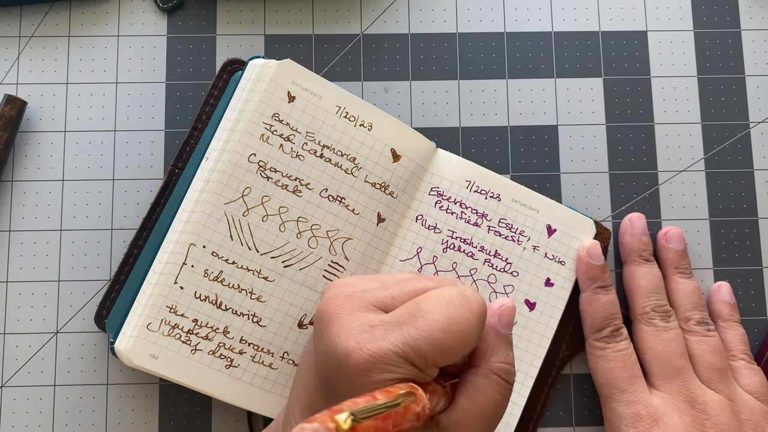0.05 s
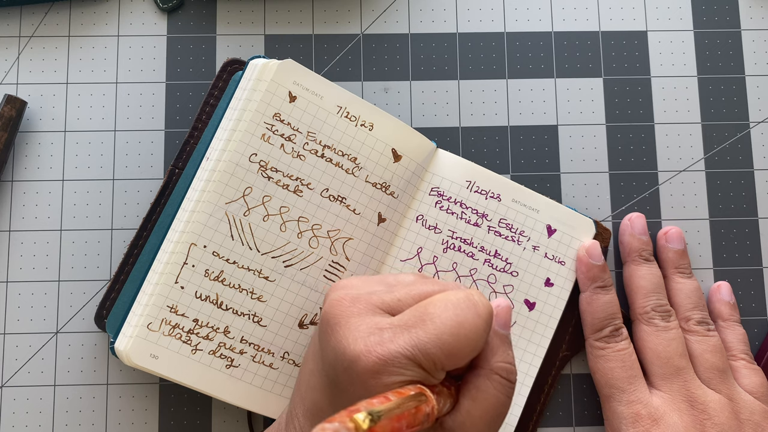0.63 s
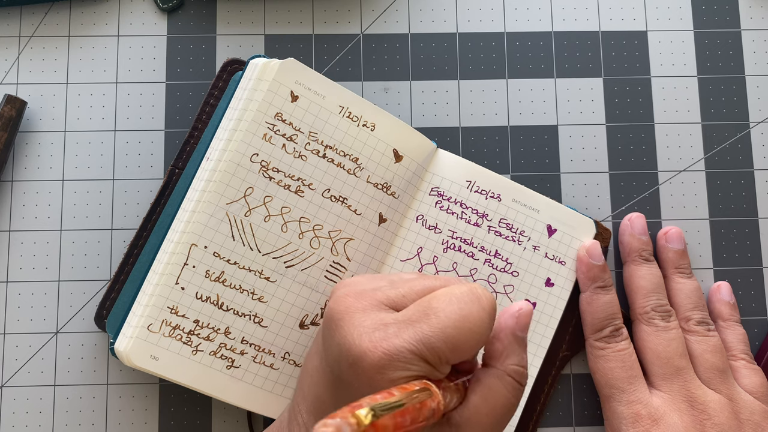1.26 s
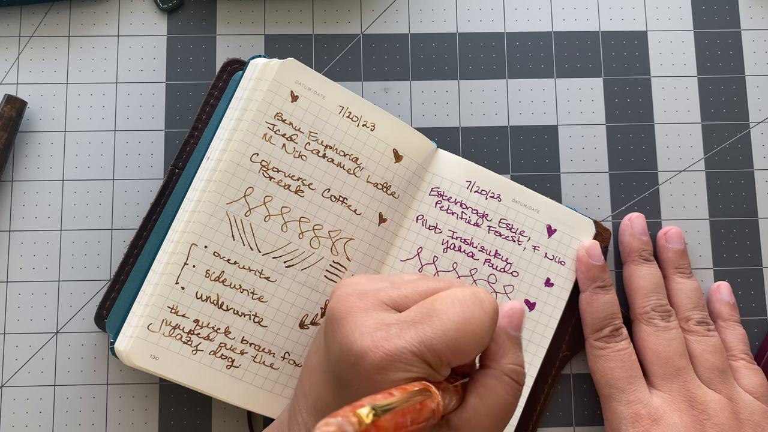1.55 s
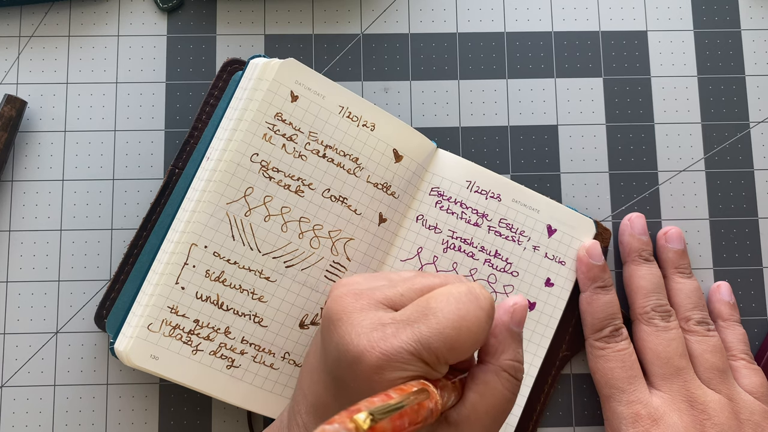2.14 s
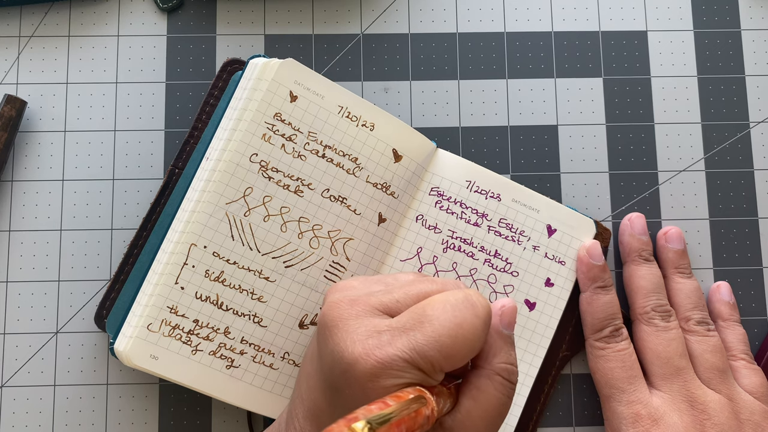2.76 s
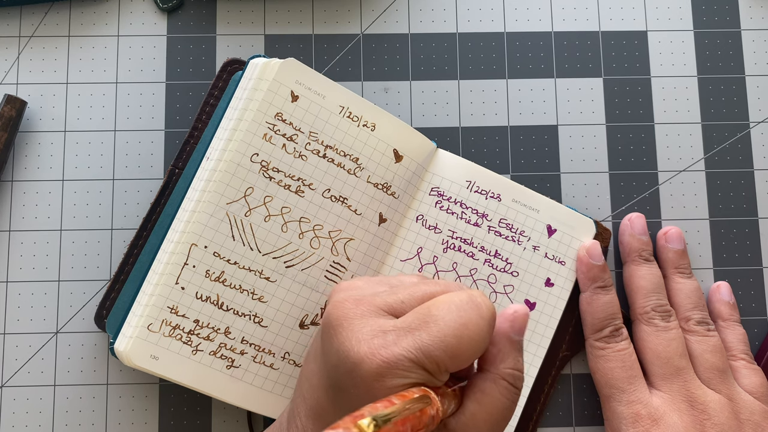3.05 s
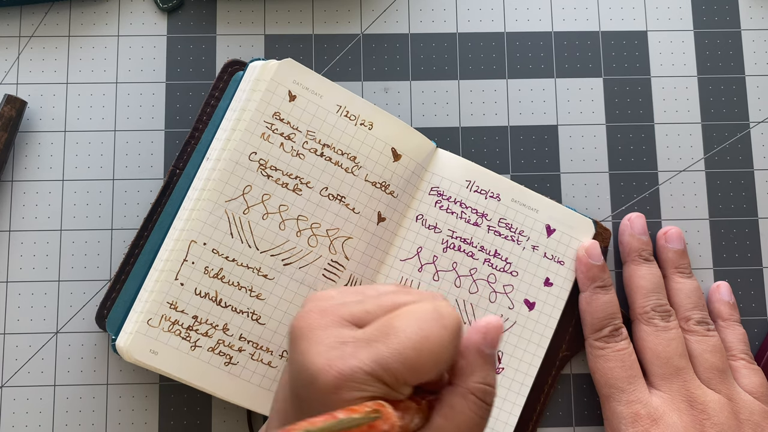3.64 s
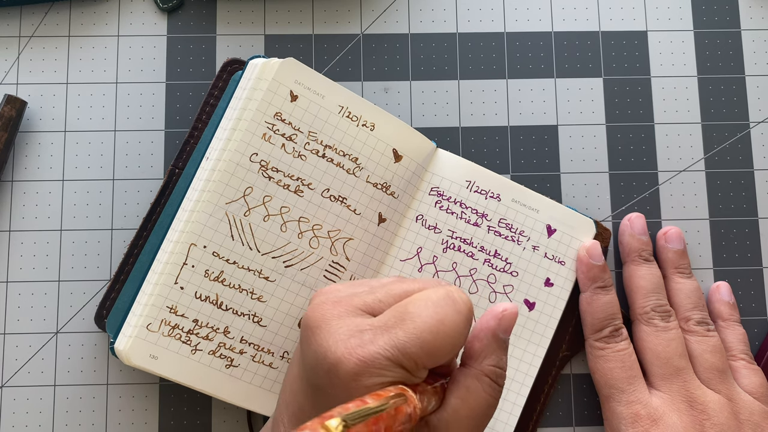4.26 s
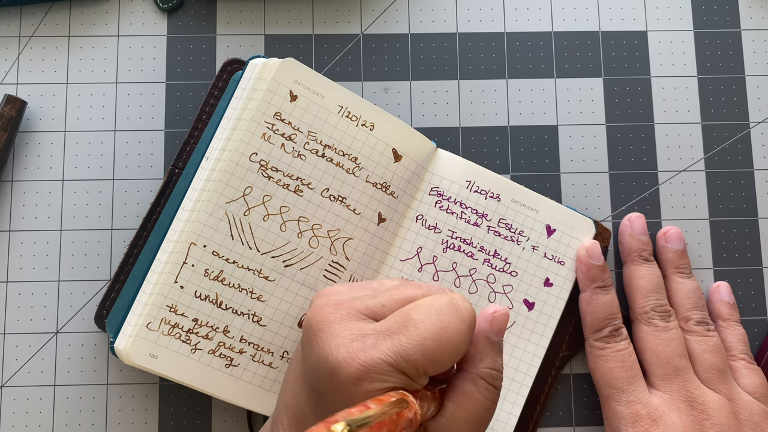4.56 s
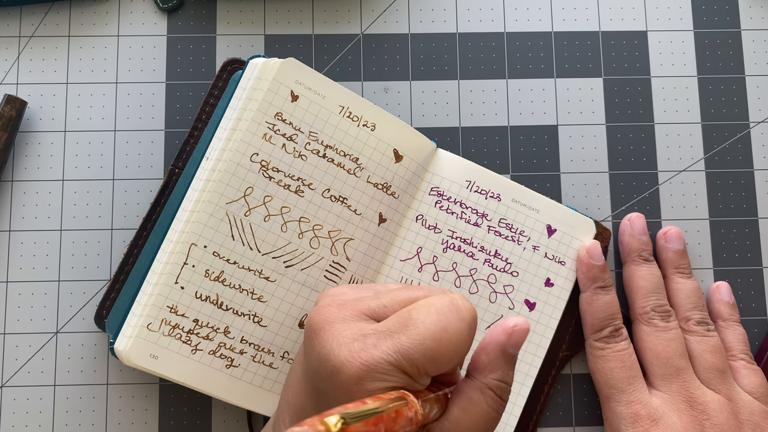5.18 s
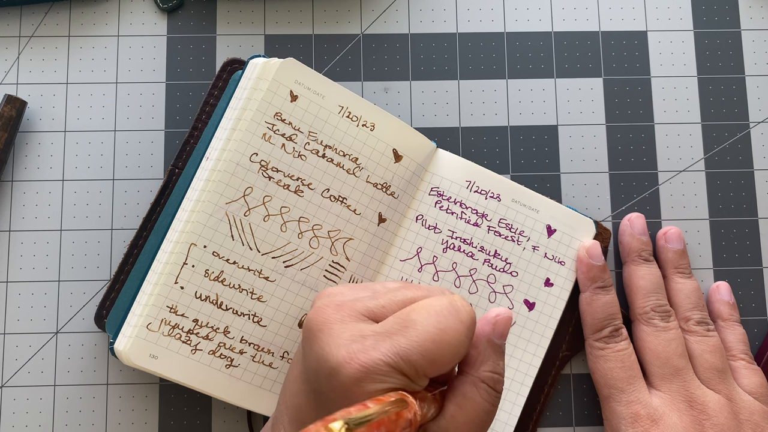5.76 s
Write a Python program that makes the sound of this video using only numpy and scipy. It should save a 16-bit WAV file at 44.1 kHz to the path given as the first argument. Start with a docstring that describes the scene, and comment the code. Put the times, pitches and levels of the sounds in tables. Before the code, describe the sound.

A pen nib scratches faintly on notebook paper in short, scattered strokes, over a low, slowly pulsing hum in a quiet room.

```python
"""Two motors beat slowly over a fan and moving air in a quiet room, from start to end.
A fountain pen touches down on a notebook close to a phone and draws slow loops by stick-slip friction.
First pulled, the nib glides with a thin hiss; pushed, from 1.1 s, it catches on paper fibres and rings
the pen and page. Near 3.5 s the hand slides across the page; then pushes and pulls go on until 6 s."""
import sys
import numpy as np
from scipy import signal
from scipy.fft import rfft, irfft, next_fast_len
from scipy.io import wavfile

SR = 44100
rng = np.random.default_rng(int(sys.argv[2]) if len(sys.argv) > 2 else 0)


def dump(signal):
    """Clip the signal to [-1, 1] and save it as 16-bit WAV at the path in sys.argv[1]."""
    limited = np.clip(np.atleast_2d(signal).T, -1, 1)
    pcm = np.round(limited * 32767).astype(np.int16)
    wavfile.write(sys.argv[1], SR, pcm)


N = 265118
T = np.arange(N) / SR
FFT_SIZE = 2 * next_fast_len(N // 2 + 1)
BINS = np.fft.rfftfreq(FFT_SIZE, 1 / SR)
CONTACT_HZ, CONTACT_WIDTH_HZ = 1136, 225  # resonance of the nib pressed on the springy pages

# Strokes against the fibres (levels in all tables are relative): start_s, length_s, level_db,
# rise_share, treble_db, bite_db, page_db, contact_hz, contact_db, sheen_db
PUSHES = [ (1.126, 0.088, -53.5, 0.39, -8.5, 3, -10.5, 1100, -4, -81),
          (3.006, 0.092, -59.5, 0.28, -6, 0, -18.5, 1140, 0, -85),
          (4.117, 0.1, -56, 0.18, 3, -6, -2.5, 1090, 6, -72),
          (4.943, 0.091, -52, 0.52, 2.5, -3.5, -2.5, 1170, -1, -84),
          (5.329, 0.12, -56.5, 0.3, 6, -3.5, -7.5, 1190, 0.5, -74), ]
# Gliding strokes: start_s, length_s, level_db, rise_share, tines_db, contact_db, lowest_mode_db, sheen_db
PULLS = [ (0.177, 0.097, -71, 0.55, 0.5, -9, 2.5, -71), (0.254, 0.079, -80.5, 0.38, -12, -9, 10, -81),
         (0.487, 0.17, -70, 0.46, 5.5, -10.5, -3, -70.5), (0.577, 0.055, -66, 0.62, 2, -12, -2, -79),
         (1.495, 0.15, -70, 0.47, -1.5, -5, -10, -77), (2.041, 0.11, -81, .35, -5.5, -15, -6, -82),
         (2.362, 0.064, -79, 0.54, -9, -12, -2, -85), (2.829, 0.077, -72, 0.3, 3.5, -17, 0, -77),
         (3.131, 0.084, -80.5, 0.4, -1, -8, 0, -83), (3.204, 0.063, -74.5, 0.38, 0, -3, 3, -83),
         (4.477, 0.165, -68, 0.3, 3.5, -1, -4, -68.5), (5.695, 0.096, -81, 0.38, -3, -8, -7, -80),
         (5.76, 0.083, -77, 0.35, 1, -3.5, -7, -77), ]
# Difference between the two microphone ports for each kind of sound: frequency_hz, side_minus_mid_db
PUSH_SIDE = [(400, -3.5), (1100, -11), (2500, -7), (3700, -2), (5200, -2), (8000, -3), (11000, 5),
             (15000, 28)]
PULL_SIDE = [(400, -7), (1200, -12), (2500, -3), (4400, -0.5), (8000, -2), (11000, 10), (12700, 8),
             (13400, 16), (15000, 26)]
SLIDE_SIDE = [(400, 3), (2000, -10), (3300, -4), (4700, 2.5), (5800, -7), (8500, 2), (10400, 4),
              (11500, 15), (13000, 24), (15300, 50)]
AIR_SIDE = [(50, -33), (110, -18), (200, -8), (380, 1), (700, 10), (1300, 3.5), (2400, 2.5), (8000, -1.5),
            (12000, 12.5), (15000, -2.5)]


def pushed_nib():
    """Stick-slip friction: coarse slips ring the pen and page, brighter at a sharper angle of the nib."""
    slips = fibres(per_s=2100, spread_db=2.5) * undb(1.56 * walk(64))
    scratch = 0
    for start, length, db, rise, treble_db, bite_db, page_db, contact_hz, contact_db, _ in PUSHES:
        force = slips * stroke(start, length, db, rise)
        ring = shape(force, pen_body(page_db, contact_hz, contact_db))
        scratch += brighten(brighten(ring, bite_db, corner_hz=1700), treble_db)
    return ports(scratch, PUSH_SIDE, diffuse=0.48)


def pen_body(page_db, contact_hz=CONTACT_HZ, contact_db=-2, vary_db=3.0, paper_db=-3):
    """Modal response: pen, paper and page add in power; each grip weights the pen's modes anew."""
    # Resonances of the pen and of the page block: frequency_hz, width_hz, level_db
    pen_modes = [(1020, 80, -2.5), (1450, 260, -7), (1595, 140, -9.5), (2004, 110, -10), (2300, 130, -11.5),
                 (2570, 110, -13.5), (3470, 120, -16.5), (3750, 260, -21.5), (5130, 190, -20.5),
                 (5710, 150, -20), (6740, 200, -24.5), (7850, 170, -23.5), (8990, 150, -30)]
    page_modes = [(207, 76, 9.5), (306, 220, 5.5), (395, 140, -1.5), (588, 73, 12.5), (730, 690, -1)]
    # Friction spectrum of a push: frequency_hz, density_db
    push_colour = [(210, -24), (350, -7), (492, 1), (592, -9), (820, -18.5), (1020, -1), (1300, -3),
                   (2700, -13.5), (3040, -17.5), (3900, -12.5), (4680, -30), (6880, -19.5), (8500, -30.5),
                   (11500, -37), (12800, -46), (14000, -59), (15500, -62)]
    gripped = [(hz, width, db + vary_db * rng.standard_normal()) for hz, width, db in pen_modes]
    ring = unit(resonances(gripped + [(contact_hz, CONTACT_WIDTH_HZ, contact_db)]))
    paper = undb(paper_db) * unit(radiated(push_colour, low_hz=593))
    page = undb(page_db) * unit(resonances(page_modes))
    return causal(np.hypot(np.hypot(ring, paper), page))


def pulled_nib(gain_db=3.5, flex=0.009, vary_db=0.5, catch_db=-14, catch_hz=7700, catch_width_hz=1900):
    """Lubricated friction: the nib hisses on its ink film, its tines sing, and stray fibres sizzle."""
    # Friction spectrum of a pull: frequency_hz, density_db
    pull_colour = [(300, -7), (600, -0.5), (850, -6.5), (1150, -4.5), (1600, -6), (2700, -9), (3600, -10.5),
                   (4500, -22.5), (6300, -15.5), (7800, -15.5), (9200, -26.5), (12700, -28), (13400, -38),
                   (15500, -49.5)]
    # Resonances of the tines: frequency_hz, width_hz, level_db
    tine_modes = [(1924, 140, 4.5), (2500, 190, 6.5), (2870, 180, -2), (3120, 180, -1), (5340, 140, -13.5),
                  (7240, 360, -14.5), (7700, 250, -7.5)]
    hiss = excite(fibres(per_s=8000, spread_db=3.0), radiated(pull_colour, low_hz=254))
    catches = excite(fibres(per_s=260, spread_db=1.0), resonances([(catch_hz, catch_width_hz, 0)]))
    slips = fibres(per_s=2200, spread_db=2.0)
    contact = excite(slips, resonances([(CONTACT_HZ, 2 * CONTACT_WIDTH_HZ, 0)]))
    bent_time = T + flex * np.cumsum(walk(5.7)) / SR  # flexing bends the tines' pitch a little
    glide = 0
    for start, length, db, rise, tines_db, contact_db, lowest_db, _ in PULLS:
        tines = resonances([(hz, width, level + lowest_db * (k == 0) + vary_db * rng.standard_normal())
                            for k, (hz, width, level) in enumerate(tine_modes)])
        rasp = np.interp(bent_time, T, unit(shape(slips, tines)))
        friction = (hiss + undb(tines_db) * rasp + undb(catch_db) * catches) / np.hypot(1, undb(tines_db))
        glide += stroke(start, length, db, rise) * (friction + undb(contact_db) * contact)
    return undb(gain_db) * ports(glide * undb(1.13 * walk(55)), PULL_SIDE, diffuse=0.6)


def tip_sheen(flicker_db=1.6, speed_power=0.67):
    """Forced vibration: the finest grain rings the tip's high modes, growing only weakly with speed."""
    # Resonances of the tip: frequency_hz, width_hz, level_db
    tip_modes = [(6770, 540, -7.5), (7700, 450, -3), (9730, 440, -6), (10860, 430, -9.5), (12480, 480, -3),
                 (14700, 1700, 3.5)]
    # Difference between the ports: frequency_hz, side_minus_mid_db
    tip_side = [(8000, -1.5), (12600, 8), (14000, 35.5)]
    contact = sum(stroke(start, length, db, rise, speed_power)
                  for start, length, _, rise, *_, db in PUSHES + PULLS)
    ring = excite(fibres(per_s=5000, spread_db=2.0), resonances(tip_modes))
    sheen = ring * contact * undb(flicker_db * walk(60))
    mid = shape(sheen, 1 / np.hypot(1, gain_at(tip_side, BINS)))  # mid and side share the power
    return ports(mid, tip_side, diffuse=0.6)


def tine_flicks(decay_s=0.0031, overtone_ratio=1.4, overtone_db=-9):
    """Damped free vibration: a tine springs off a fibre and rings for a few milliseconds."""
    # Releases of a tine: start_s, level_db, pitch_hz
    flicks = [(0.225, -65, 2500), (0.541, -60.5, 2500), (0.559, -57.5, 2480), (0.603, -54.5, 3090),
              (0.694, -63.5, 3100), (1.15, -52, 2660), (1.540, -55.5, 2460), (1.552, -57, 2500),
              (1.581, -60, 2520), (3.458, -49.5, 2950), (4.499, -59, 2460), (4.570, -61, 2890),
              (4.964, -48, 2580)]
    rings = 0
    for start, db, hz in flicks:
        age = np.clip(T - start, 0, 0.1)
        phase = 2 * np.pi * hz * age
        partials = np.sin(phase) + undb(overtone_db) * np.sin(overtone_ratio * phase)
        rings += undb(db) * np.exp(-age / decay_s) * partials
    return ports(rings, PULL_SIDE[:5], diffuse=0.46)


def nib_ticks(gain_db=6, crunch_s=0.0088, crunch=0.15, blow_samples=2048):
    """Impulse excitation: a tap or snag sends one blow and a crunch of fibres into the pen's modes."""
    # Taps and snags: start_s, level_db, treble_db
    ticks = [(0.091, -59, -7), (0.509, -61.5, 9), (0.604, -50, 0), (0.616, -51, 4), (0.661, -50.5, -3),
             (1.427, -65, 8), (1.520, -55.5, 6), (3.091, -59, 0), (3.429, -72, 12), (3.458, -49.5, 3),
             (4.132, -50.5, -2), (4.157, -54, -5), (4.187, -54, 2), (4.572, -55, -3), (4.628, -55.5, -9),
             (4.847, -56, -12), (4.956, -49, -12), (4.965, -39, -17), (4.986, -38.5, -2), (5.247, -61, 2),
             (5.347, -46, -5), (5.946, -58.5, 0)]
    start_s, level_db, treble_db = np.transpose(ticks)
    body = pen_body(page_db=-14)
    force = np.zeros(N)
    for start, size in zip((start_s * SR).astype(int), undb(level_db)):
        blow = crunch * rng.standard_normal(blow_samples) * np.exp(-T[:blow_samples] / crunch_s)
        blow[0] = 1
        force[start:start + blow_samples] += size * blow[:N - start]
    taps = brighten(shape(force, body), np.interp(T, start_s, treble_db))
    return undb(gain_db) * ports(taps, PUSH_SIDE, diffuse=0.34)


def page_knocks(gain_db=-4):
    """Damped impact: a soft blow settles the stacked pages with a short, dull rustle."""
    # Blows of pen and hand on the notebook: start_s, decay_s, level_db
    knocks = [(0.098, 0.0051, -42), (0.652, 0.018, -52.5), (2.85, 0.015, -52), (3.527, 0.047, -55.5)]
    # Spectrum of the struck pages: frequency_hz, density_db
    knock_colour = [(90, -4.5), (180, 1), (400, -5.5), (650, -12.5), (900, -21.5), (1300, -22),
                    (1800, -36.5), (12000, -71)]
    settling = sum(undb(db) * (T > at) * np.exp(-np.abs(T - at) / decay) for at, decay, db in knocks)
    page = causal(unit(gain_at(knock_colour, BINS)))
    rustle = shape(rng.standard_normal(N) * settling, page)
    return undb(gain_db) * ports(rustle, PUSH_SIDE[:3], diffuse=0.39)


def paper_squeaks(width_hz=700):
    """Resonance: friction noise gathers for a moment in one high, narrow band."""
    # Thin squeaks: centre_s, length_s, level_db, pitch_hz
    squeaks = [(1.586, 0.049, -73, 5210), (2.353, 0.023, -80, 5600), (2.4, 0.032, -72.5, 5680),
               (3.43, 0.031, -74, 5530), (3.477, 0.03, -58, 5400)]
    noise, rings = rng.standard_normal(N), 0
    for centre, length, db, hz in squeaks:
        rings += unit(shape(noise, resonances([(hz, width_hz, 0)]))) * swell(centre, length, db)
    return ports(rings, SLIDE_SIDE, diffuse=0.45)


def hand_slide(gain_db=1):
    """Sliding friction: dense slips of skin on the page merge into a smooth, bright swish."""
    # Spectrum of skin on paper: frequency_hz, density_db
    slide_colour = [(150, -7), (370, 8), (700, 3), (1100, 6), (1700, -2), (2850, 6), (3600, -2), (4600, -1),
                    (5300, 4.5), (6700, 1.5), (8800, -3), (10400, 0), (11500, -22), (15500, -46)]
    slips = fibres(per_s=20000, spread_db=1.0) * undb(1.4 * walk(55)) * hand_pressure()
    swish = shape(slips, causal(unit(radiated(slide_colour, low_hz=246))))
    return undb(gain_db) * ports(swish, SLIDE_SIDE, diffuse=0.64)


def hand_pressure(touch_s=3.414, press_s=3.451, slows_s=3.5535, attack_s=0.011, release_s=0.11):
    """Friction follows load: a light touch, a quick press that eases off, and a gradual stop."""
    touch_db, press_db, sag_db_per_s = -75.5, -59, -4
    touch = undb(touch_db) * np.clip((T - touch_s) / attack_s, 0, 1)
    sliding_s = np.clip(T - press_s, 0, 1)
    press = undb(press_db + sag_db_per_s * sliding_s) * np.minimum(sliding_s / attack_s, 1)
    return (touch + press) * np.clip(1 - (T - slows_s) / release_s, 0, 1) ** 2


def low_swells(band_hz=190, width_hz=260):
    """Amplitude-modulated noise: soft, low swells of rumble, some accompanying the pen strokes."""
    # Swells of rumble: centre_s, length_s, level_db
    swells = [(0.2, 0.44, -62), (1.28, 0.3, -60.5), (1.81, 0.08, -66), (2.661, 0.19, -65.5),
              (3.08, 0.12, -58.5), (3.57, 0.092, -56.5), (3.86, 0.25, -64), (4.22, 0.26, -63),
              (4.562, 0.19, -58), (5.36, 0.14, -58.5), (5.65, 0.17, -62)]
    envelope = sum(swell(*row) for row in swells)
    colour = resonances([(band_hz, width_hz, 0)]) * radiated([(400, -3.5), (1200, -9.5)], low_hz=111)
    rumble = unit(shape(rng.standard_normal(N), colour))
    return ports(rumble * envelope, AIR_SIDE[:3], diffuse=0.38)


def room(x, t60_s=0.21, wet_db=-12.0, dull_hz=4000):
    """Reverberation: a small furnished room adds a faint, dull tail, different at each port."""
    tail = rng.standard_normal((2, N)) * np.exp(-np.log(1000) * T / t60_s) * (T > .005)
    response = rfft(tail, FFT_SIZE) / np.linalg.norm(tail[0]) / np.hypot(1, BINS / dull_hz)
    return undb(wet_db) * shape(x.mean(axis=0), response)


def motors(motor_hz=58.95, beat_hz=.428, strong_db=-46.5, weak_db=-49, in_step_s=0.15, waver_db=2.5):
    """Beats: the hum of two motors at nearly one speed swells and sinks; fainter tones waver above."""
    # Fan tones and motor overtones: pitch_hz, level_db
    tones = [(85.4, -61), (128.1, -72), (174.2, -72.5), (213.5, -75), (258, -74.5), (298.9, -75),
             (351.2, -77.5), (582, -90)]
    phase_per_hz = 2 * np.pi * (T - in_step_s)
    offset = rng.uniform(0, 2 * np.pi)
    hum = undb(strong_db) * np.sin(motor_hz * phase_per_hz + offset)
    hum += undb(weak_db) * np.sin((motor_hz - beat_hz) * phase_per_hz + offset)
    for hz, db in tones:
        hum += undb(db + waver_db * walk(1.5)) * np.sin(2 * np.pi * (hz * T + rng.random()))
    return np.sqrt(2) * hum


def ventilation(flutter_db=1.46, rumble_hz=500):
    """Flow noise: a fluttering rumble, alike at both ports in the bass, under a smooth diffuse hiss."""
    # Spectrum of the moving air: frequency_hz, density_db
    air_colour = [(20, -79.5), (33, -83), (41, -65.5), (50, -70), (65, -67.5), (95, -73.5), (150, -81.5),
                  (260, -89), (400, -99), (700, -109), (1300, -114.5), (4000, -119.5), (9500, -126),
                  (12000, -148), (16000, -148)]
    density = gain_at(air_colour, BINS) * np.sqrt(SR / 2)
    mid = shape(rng.standard_normal(N), density)
    side = shape(rng.standard_normal(N), density * gain_at(AIR_SIDE, BINS))
    air = np.array([mid + side, mid - side])
    rumble = shape(air, 1 / (1 + (BINS / rumble_hz) ** 2))
    return air + rumble * (undb(flutter_db * walk(10)) - 1)


def stroke(start_s, length_s, db, rise_share, speed_power=1.58):
    """Power law: friction noise grows with speed as the nib starts from rest, then fades as it slows."""
    fastest_s = start_s + length_s * np.clip(rise_share, .05, .95)
    speed = np.sin(np.pi / 2 * np.interp(T, [start_s, fastest_s, start_s + length_s], [0, 1, 0]))
    return undb(db) * speed ** speed_power


def fibres(per_s, spread_db):
    """Shot noise: paper fibres let go at random moments, in many small slips and a few large ones."""
    slips = rng.random(N) < per_s / SR
    size = undb(spread_db * np.minimum(rng.exponential(size=N), 4))
    return unit(slips * size * rng.choice([-1, 1], N))


def ports(x, side, diffuse, scatter_s=0.0061):
    """Pressure gradient: two close ports differ by a part in quadrature, plus scatter from the desk."""
    scatter = rng.standard_normal(N) * np.exp(-T / scatter_s)
    scattered = np.sqrt(diffuse) * rfft(scatter, FFT_SIZE) / np.linalg.norm(scatter)
    direct = 1j * np.sqrt(1 - diffuse)
    difference = shape(x, gain_at(side, BINS) * (direct + scattered))
    return np.array([x + difference, x - difference])


def resonances(modes):
    """Gain of modes that add in power."""
    return np.sqrt(sum(undb(2 * db) / (1 + (2 * (BINS - hz) / width) ** 2) ** 2
                       for hz, width, db in modes))


def radiated(colour, low_hz):
    """Radiation efficiency: thin paper gives off a friction spectrum without its deep bass."""
    return gain_at(colour, BINS) * BINS ** 2 / (BINS ** 2 + low_hz ** 2)


def excite(force, gain):
    """Source and filter: the causal response to a force, scaled to rms 1."""
    return unit(shape(force, causal(gain)))


def causal(gain):
    """Minimum phase: the response with this gain that rings only after its cause."""
    cepstrum = irfft(np.log(gain + 1e-9), FFT_SIZE)
    fold = np.r_[1, np.full(FFT_SIZE // 2 - 1, 2), np.zeros(FFT_SIZE // 2)]
    return np.exp(rfft(cepstrum * fold))


def brighten(x, db, corner_hz=3500):
    """A shelving filter lifts or lowers the treble."""
    treble = shape(x, 1 - 1 / (1 + (BINS / corner_hz) ** 4))
    return x + (undb(db) - 1) * treble


def shape(x, response):
    """Filter by a frequency response."""
    return irfft(rfft(x, FFT_SIZE) * response, FFT_SIZE)[..., :N]


def swell(centre_s, length_s, db):
    """Gaussian envelope."""
    return undb(db) * np.exp(-(2 * (T - centre_s) / length_s) ** 2)


def walk(rate_hz):
    """Low-passed noise: a smooth random drift of rms 1."""
    return unit(shape(rng.standard_normal(N), np.exp(-(BINS / rate_hz) ** 2)))


def gain_at(points, hz):
    """Gain of a spectrum, interpolated on a log frequency axis."""
    point_hz, db = np.transpose(points)
    return undb(np.interp(np.log(hz + 1), np.log(point_hz), db))


def undb(db):
    """Decibels to gain."""
    return 10 ** (np.asarray(db) / 20)


def unit(x):
    """Scale to rms 1."""
    return x / np.sqrt(np.mean(x ** 2))


def scene():
    """Superposition: pen, hand and low swells, their reverberation, and the room's hum and air."""
    nib = pushed_nib() + pulled_nib() + tip_sheen() + tine_flicks() + nib_ticks()
    near = nib + page_knocks() + paper_squeaks() + hand_slide() + low_swells()
    return near + room(near) + motors() + ventilation()


def record(dry):
    """Band limiting: the phone's steep low-pass filter cuts the highest treble."""
    top_hz = 15750
    return signal.sosfilt(signal.ellip(10, .1, 80, top_hz, fs=SR, output="sos"), dry)


dry = scene()
out = record(dry)
dump(out)
```